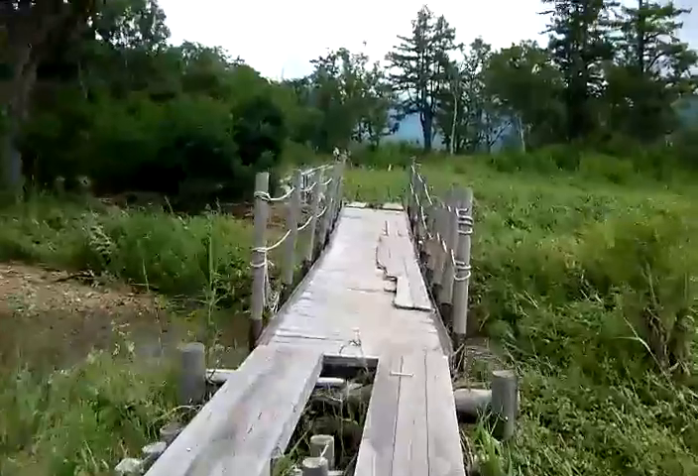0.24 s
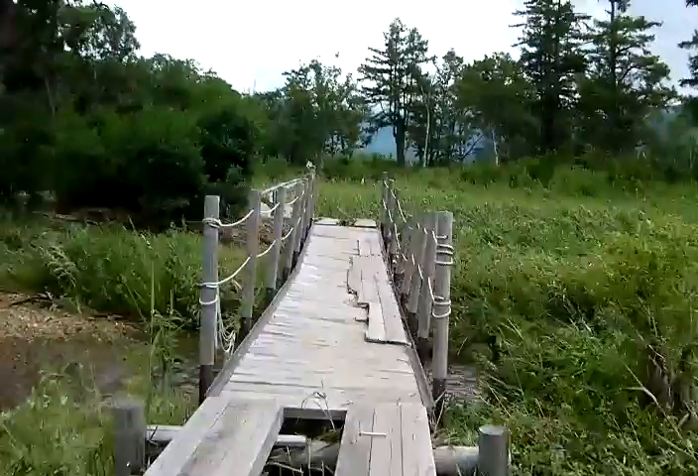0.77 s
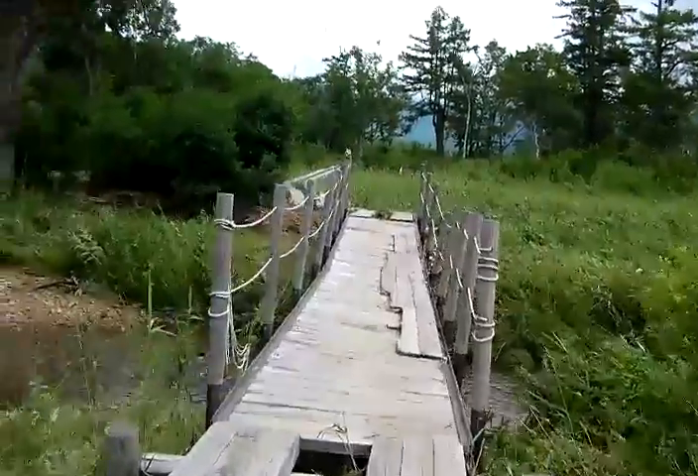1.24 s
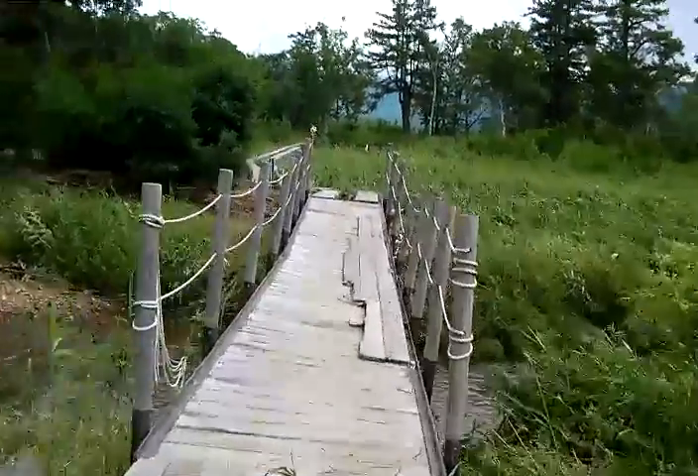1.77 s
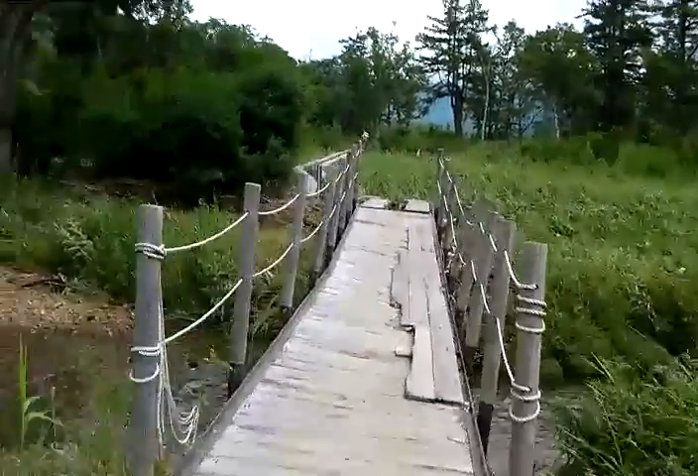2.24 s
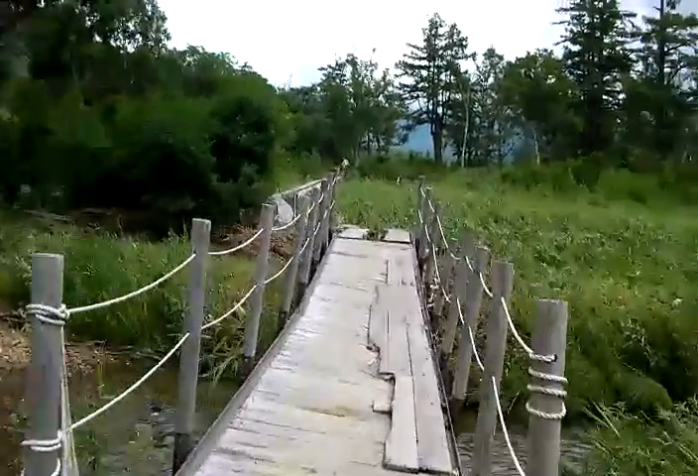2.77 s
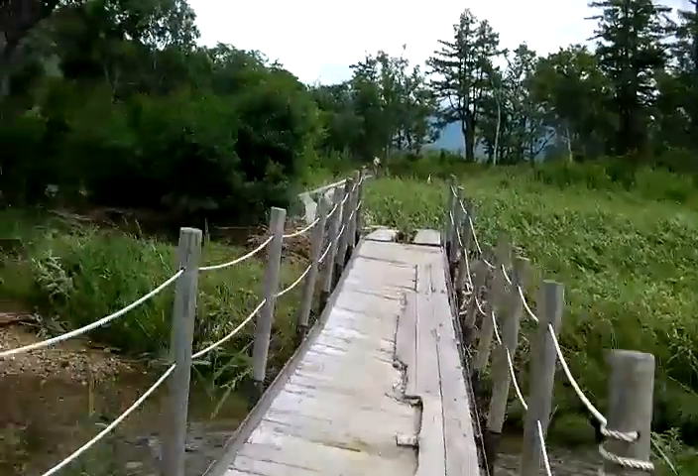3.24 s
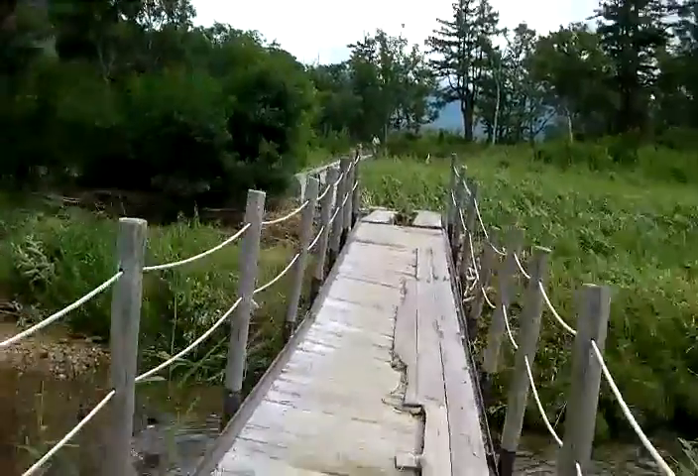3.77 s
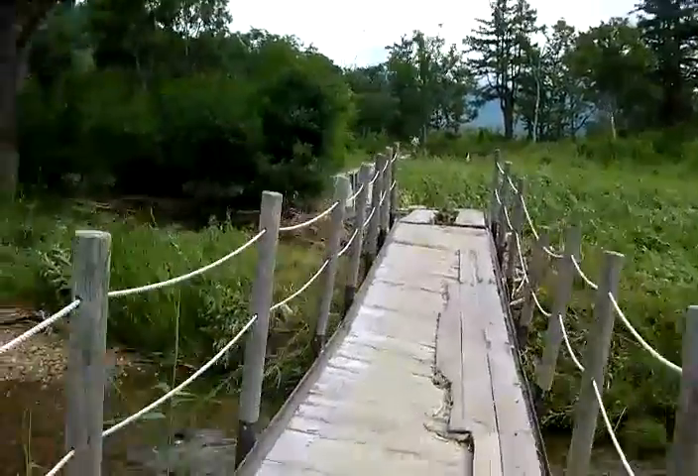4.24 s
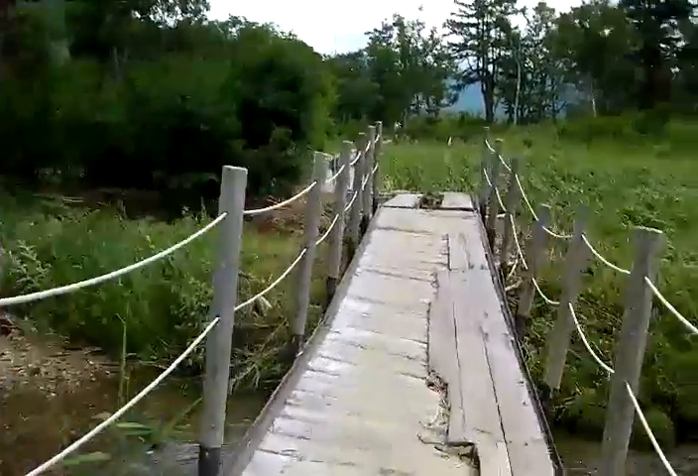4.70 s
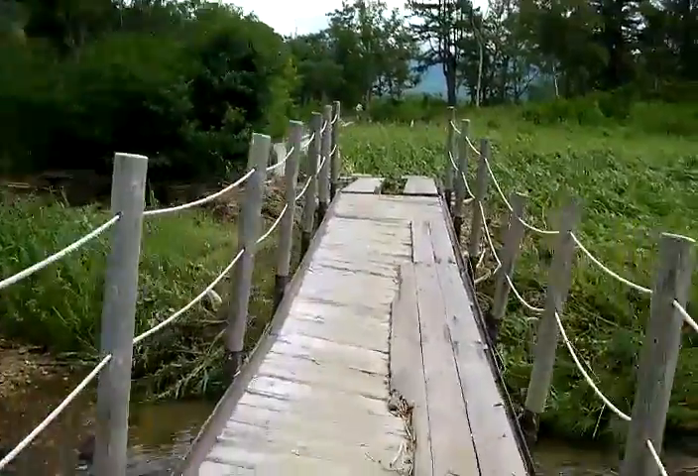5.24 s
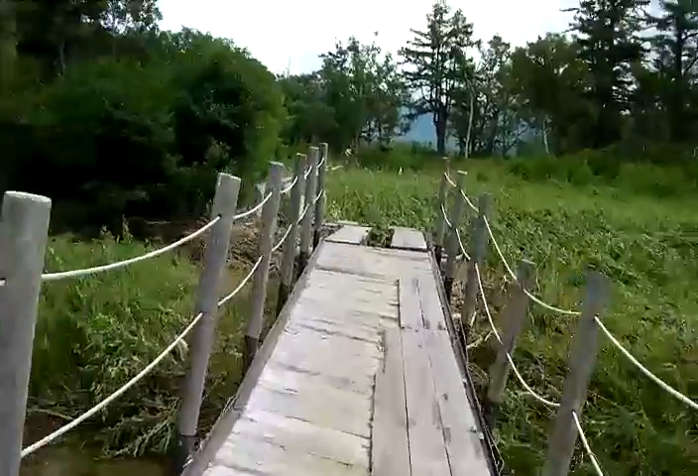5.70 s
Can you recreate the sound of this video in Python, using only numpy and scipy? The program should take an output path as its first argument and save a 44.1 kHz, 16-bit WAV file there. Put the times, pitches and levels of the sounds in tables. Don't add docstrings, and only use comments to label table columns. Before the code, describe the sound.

Steady hiss of a marsh stream grows closer and splashier while soles knock on wooden planks and one loose board clatters.

```python
import sys
import numpy as np
from scipy import signal
from scipy.fft import rfft, irfft, next_fast_len
from scipy.io import wavfile
from scipy.ndimage import uniform_filter1d, map_coordinates

SR = 44100
rng = np.random.default_rng(int(sys.argv[2]) if len(sys.argv) > 2 else 0)


def transcribe(signal):
    frames = np.atleast_2d(signal).T
    limited = np.clip(frames, -1, 1)
    pcm = np.round(limited * 32767).astype(np.int16)
    wavfile.write(sys.argv[1], SR, pcm)


def volts_from_db(level):
    exponent = np.asarray(level, float) / 20
    return 10 ** exponent


N = 263718

# frequency in Hz, level in dB.
PORT_HISS = [(30, -47), (100, -48), (220, -51), (600, -52), (1200, -62), (3000, -58), (8000, -62)]

# start in seconds, length in seconds, level in dB, from pitch in Hz, to pitch in Hz.
TRILLS = [
    (2.25, .17, -47, 7000, 7270),
]
WHISTLES = [
    (3.26, .11, -42, 7100, 6400),
    (3.41, 0.041, -53, 6500, 6500),
]

# frequency in Hz, density in dB per Hz.
HUM = [(25, 0), (48, -4.5), (70, 4), (100, 1.5), (160, -7.5), (260, -15), (340, -47), (600, -120)]
GURGLE = [(100, -90), (200, -45), (290, -9.5), (370, -4.5), (600, -3), (1000, -0.5), (1600, -4),
          (3000, -7.5), (5000, -90)]
RUSH = [(200, -80), (500, -45), (900, -12), (1500, -2), (2300, -2), (2700, -5), (3200, -1.5), (5000, -4.5),
        (9000, -18.5), (12000, -56)]
SPRAY = [(600, -80), (1800, -68), (3000, -6.5), (4500, -2), (6000, 1), (7400, 2), (8300, -6), (9300, -8),
         (10100, -19), (11400, -10.5), (12300, -17), (13100, -43), (15000, -59)]

# start in seconds, level in dB.
SWAYS = [(0.01, -58), (.32, -54), (.42, -49), (.93, -50), (1.14, -59), (1.33, -53), (1.46, -44.5),
         (1.6, -52), (1.79, -37), (1.94, -47), (2.2, -43), (2.47, -55), (2.65, -49), (2.87, -54),
         (2.99, -49), (3.17, -55), (3.57, -42), (3.81, -51), (4.07, -47), (4.17, -49), (4.37, -55),
         (4.47, -58), (4.63, -31), (4.76, -53), (4.96, -58), (5.139, -43), (5.22, -28), (5.53, -54),
         (5.72, -42), (5.79, -40)]
SWAY_RISE_S, SWAY_T60_S = 0.03, 0.4

# time in seconds, level in dB.
NEAR = [(0.0, -42.5), (0.23, -46), (0.95, -43.5), (1.63, -42), (1.9, -42), (2.55, -40.5), (3.51, -40),
        (4.73, -36.5), (5.25, -38.5), (5.7, -36.5), (5.98, -38)]
GURGLE_DB, RUSH_DB, SPRAY_DB = -3.5, -5, -2.5
GURGLE_GROWS, RUSH_GROWS, SPRAY_GROWS = 0.38, 0.67, 1.25
BRIDGE_S, BRIDGE_SPAN_S, BRIDGE_DB = 1.39, 0.07, 6
RIFFLE_S, RIFFLE_SPAN_S, RIFFLE_DB = 4.2, 0.96, 3.5

# start in seconds, peak level in dB.
SPITS = [(0.1885, -40), (0.4803, -41), (1.2675, -55), (1.2855, -42), (1.4965, -33), (2.1231, -43),
         (2.156, -47), (2.2169, -45), (2.4877, -46), (2.616, -42), (2.9796, -47), (3.5059, -52),
         (3.5972, -42), (3.6252, -33), (3.8417, -41), (3.8581, -35), (3.902, -39), (3.9735, -28),
         (4.0602, -46), (4.0856, -35), (4.1864, -45), (4.3161, -41), (4.3365, -45), (4.3964, -36),
         (4.6404, -40), (4.6588, -38), (4.9726, -30), (5.0818, -38), (5.0993, -32), (5.18, -26),
         (5.2121, -32), (5.3692, -41), (5.4615, -47), (5.5238, -42), (5.5433, -37), (5.5613, -35),
         (5.676, -34), (5.7643, -36), (5.9289, -36), (5.9529, -35)]

# start in seconds, peak level in dB, pitch in Hz.
SPLASHES = [(0.191, -21.5, 5070), (0.2778, -25, 5600), (0.378, -23, 5670), (1.393, -27, 3100),
            (1.958, -25, 4540), (1.9884, -24, 4360), (1.9967, -18.5, 4970), (2.598, -23, 4800),
            (4.588, -20, 4900), (2.72, -22, 7100), (2.805, -24, 7100), (2.99, -24, 7300),
            (2.6512, -20, 4900), (3.175, -25.5, 2500), (3.192, -25, 4460), (3.626, -15.5, 6840),
            (3.687, -17, 7100), (3.792, -18, 5300), (3.8382, -14, 6300), (3.9724, -19, 4240),
            (4.0857, -21, 2990), (4.3166, -15, 7200), (4.417, -11, 6740), (4.594, -18, 6000),
            (4.673, -14, 7200), (4.727, -17, 7160), (4.6573, -12.5, 6550), (4.689, -16, 4430),
            (4.7466, -35, 7470), (5.13, -14, 6200), (5.135, -14, 7300), (5.117, -21, 6200),
            (5.3008, -16, 6010), (5.5695, -11, 5900), (5.545, -16, 6000), (.29, -26, 5040),
            (.3591, -28, 5930), (.1306, -22, 4440), (1.6791, -33, 2970), (2.1036, -26, 6150),
            (3.5977, -27, 3040), (4.1644, -22, 2930), (4.2243, -22, 5960), (4.362, -19, 6790),
            (4.99, -16, 6200), (5.19, -14, 6500), (5.205, -15, 6800), (5.6138, -14, 5230),
            (5.7928, -10, 7180)]
SMALL_DB, SMALL_HZ, SMALL_SPREAD = -29, 5800, 0.25

# start in seconds, peak level in dB, pitch in Hz, length in cycles.
BUBBLES = [(0.126, -37, 427, 6), (1.132, -19, 2170, 3), (1.2, -26.5, 1880, 9.7), (1.279, -27, 2050, 9.2),
           (1.619, -32, 795, 13), (2.046, -26, 1150, 5), (2.103, -30, 402, 3.9), (2.128, -28.5, 665, 7.1),
           (3.194, -30.5, 443, 5), (3.231, -27, 455, 4.1), (3.255, -31.5, 462, 7.1), (3.342, -26, 670, 3),
           (4.269, -27, 1770, 13), (4.56, -29, 964, 5.6), (4.885, -23.5, 990, 5.4),
           (5.091, -24.5, 1120, 9.5), (5.158, -32, 530, 7.5), (5.259, -15, 1510, 2.9), (5.443, -33, 590, 9),
           (5.569, -24, 765, 5.2), (5.797, -22, 1640, 3.4), (5.946, -20.5, 1070, 4.1)]

# start in seconds, peak
# level in dB, pitch in Hz, 60 dB decay in seconds, pitch rise as a ratio.
GLUGS = [(1.479, -25, 2600, .012, .05), (1.497, -26, 1500, .016, .09), (1.792, -32, 1300, .015, .1),
         (2.018, -33, 390, .09, .02), (2.197, -33, 420, .08, .02), (2.5305, -26, 1080, .016, .05),
         (2.533, -28, 450, .08, .02), (3.104, -28, 1250, .012, .4), (3.109, -31, 1700, .01, .1),
         (4.317, -43, 67, .15, .02), (4.692, -27, 190, .08, .01), (5.175, -34, 72, .16, .02),
         (5.265, -29, 1700, .03, .12), (5.463, -19, 870, .026, 1.15), (5.722, -30, 260, .05, .02),
         (1.462, -23, 115, .1, .02),
    (1.857, -25, 470, .07, .2),
]

# centre in seconds, level in dB, length in seconds.
SCUFFS = [
    (1.135, -46.5, 0.078),
    (1.2, -47, 0.026),
    (1.487, -35, 0.031),
    (2.045, -39, 0.012),
    (2.207, -43.5, 0.064),
    (3.115, -40, 0.014),
    (3.333, -38, 0.064),
    (4.157, -46, 0.025),
    (5.468, -38.5, 0.025),
    (5.787, -39, 0.014),
]

# start in seconds, level in dB.
SNAPS = [
    (1.136, -32),
    (1.497, -30),
    (1.789, -31),
    (3.902, -33),
    (4.5937, -14),
    (4.6893, -21),
    (5.571, -28),
]

# start in seconds, peak level in dB, pitch in Hz, length in cycles.
TAPS = [(.859, -41, 350, 2), (.9335, -29, 2000, 5), (.936, -33, 424, 2.6), (1.79, -28, 646, 2.6),
        (1.8485, -26, 900, 3.4), (1.941, -25, 480, 1.5), (2.5292, -14, 1100, 2.1), (3.579, -33, 130, 1.8),
        (2.989, -27.5, 450, 2), (3.068, -29, 600, 1.8), (4.0766, -25.5, 446, 1.7), (4.631, -25, 500, 1.6),
        (4.69, -16, 2300, 2), (4.6896, -17.5, 1520, 3.2), (4.6897, -18, 604, 1.8), (5.224, -30, 1300, 2.6),
        (5.4641, -20.5, 1200, 3), (5.718, -23, 330, 2.1), (5.7968, -22, 2300, 4), (5.799, -32, 1420, 4),
        (5.863, -28, 3100, 6.7), (5.707, -38, 1090, 6), (1.83, -36, 1280, 6), (3.915, -30, 1620, 6),
        (4.026, -29, 2220, 6.5), (.598, -33, 2100, 7.3), (.647, -34, 3100, 9), (.612, -30, 3900, 7.4)]

# start in seconds, blow level in dB, contact in milliseconds.
BOUNCES = [
    (1.4529, -5.5, 1.47),
    (1.46, -4, 0.61),
    (1.4659, -18, 1.24),
    (1.4737, -1.5, 2.7),
    (1.4796, -17, 2.9),
    (1.4911, -20, 1.9),
    (1.499, -25, 1.6),
    (1.521, -28, 2.3),
    (1.539, -32.5, 1.6),
]
# frequency in Hz, level in dB, 60 dB decay in seconds.
LOOSE = [(114, 0.5, 0.051), (208, 2.5, 0.063), (269, 0, 0.1), (330, 1.5, 0.091), (388, -1, 0.18),
         (508, 9, 0.032), (641, 1, 0.064), (780, -3, 0.042), (880, -8, .022), (1270, -13, 0.031),
         (1670, -22, .02), (2500, -5, .015)]

# start in seconds, board knock in dB, beam thump in dB, beam pitch in Hz, sole slap in dB.
HEELS = [(0.317, -39, -44, 100, -46), (0.856, -45, -49, 107, -48), (0.933, -43, -43, 75.4, -36),
         (1.787, -29, -22, 116, -24), (2.006, -30.5, -46, 115, -29), (2.192, -43, -63, 80.7, -36),
         (2.989, -31, -47, 110, -39), (3.529, -36.5, -86, 67.3, -45), (3.578, -39, -38.5, 81, -34.5),
         (4.074, -33.5, -58, 94.2, -24.5), (4.154, -32, -41, 88, -39), (4.182, -43, -50, 82, -27),
         (4.631, -37, -27.5, 105, -36), (4.642, -47, -35, 100, -47), (4.734, -48, -41, 75, -55),
         (4.766, -57, -45, 80.4, -55), (5.262, -50, -39, 85, -50), (5.749, -50, -42, 100, -50),
         (3.8, -57, -42, 72, -55), (5.223, -33.5, -37, 86.1, -29), (5.303, -34, -50, 88.8, -25),
         (5.718, -27, -28, 98, -43), (5.784, -44, -33, 96.4, -44), (5.773, -55, -42, 90, -55)]
# start in seconds, board knock in dB, board pitch in Hz, joist thump in dB, sole slap in dB.
TOES = [(0.385, -38.5, 420, -55, -34), (0.424, -48, 597, -52, -62), (1.849, -24, 394, -36, -29),
        (1.938, -41, 605, -49, -46), (2.463, -28, 390, -51, -47), (2.528, -24, 384, -53, -19),
        (2.581, -41, 590, -54, -30.5), (3.065, -29.5, 488, -65, -27), (3.613, -36, 384, -43.5, -37),
        (4.6881, -37, 500, -33.5, -14), (5.142, -32.5, 564, -51, -46)]
PLANK_HZ, JOIST_HZ = 390, 169.4
# frequency in Hz, level in dB.
SLAP = [(120, -33), (300, -6.5), (600, -3.5), (1000, -9.5), (1600, -4.5), (2400, -11.5), (5000, -17),
        (9000, -38)]

# frequency in Hz, left-right correlation from 0 to 1.
ALIKE = [(5000, 0.85), (6200, 0.75), (7600, 1), (8300, 0.76), (9200, 0.27), (11000, 0.51), (13000, 0.1)]
# frequency in Hz, left over right in dB.
LEAN = [(5000, .4), (5800, 1.5), (7500, 3), (8800, 7.5), (9600, -1), (10600, 7), (11700, 2), (13000, 15)]
# frequency in Hz, phase lead in radians.
LEAD = [(7240, 0.24), (7840, 1.53), (8870, 0.34), (9300, 6.1), (9730, 6.8), (13200, 8.1)]
MONO_HZ, TOP_HZ = 4300, 13400


def unit(x):
    return x / np.sqrt(np.mean(x ** 2) + 1e-20)


def along(points, hz):
    f, v = np.transpose(points)
    return np.interp(np.log(hz + 1), np.log(f + 1), v)


def curves(rows):
    s, *cols = np.transpose(rows)
    return [np.interp(np.arange(N) / SR, s, c) for c in cols]


def wobble(rate):
    knots = rng.standard_normal(int(N * rate / SR) + 4)
    return map_coordinates(knots, [np.arange(N) * rate / SR])


def onset(s, span):
    return 0.5 + 0.5 * np.tanh((np.arange(N) / SR - s) / span)


def filtered(x, response):
    m = 2 * next_fast_len(N // 2 + 4096)
    return irfft(rfft(x, m) * response(np.fft.rfftfreq(m, 1 / SR)), m)[..., :N]


def causal(points, hz):
    cepstrum = irfft(np.log(volts_from_db(along(points, hz))))
    cepstrum[1:len(hz)] *= 2
    cepstrum[len(hz):] = 0
    return np.exp(rfft(cepstrum))[:len(hz)]


def rings(s, db, hz, t60, attack, rise, size):
    columns = np.broadcast_arrays(s, db, hz, t60)
    s, db, hz, t60 = (np.asarray(v, float)[:, None] for v in columns)
    t = np.arange(size) / SR
    wave = np.sin(2 * np.pi * hz * t * (1 + rise * t / t60))
    wave = wave * volts_from_db(db - 60 * t / t60) * (1 - np.exp(-t / attack))
    at = (s * SR).astype(int) + np.arange(size)
    return np.bincount(at.ravel(), wave.ravel(), N + size)[:N]


def call(rows, slur, attack, t60, rough_db, rough_hz, rate):
    t, out = np.arange(N) / SR, 0
    for s, length, db, from_hz, to_hz in rows:
        glide = np.exp(-np.maximum(t - s, 0) / (slur * length))
        hz = to_hz + (from_hz - to_hz) * glide + rough_hz * wobble(2 * rate)
        fade_db = -60 * np.maximum(t - s - length, 0) / t60
        shape = np.clip((t - s) / attack, 0, 1) * volts_from_db(db + fade_db + rough_db * wobble(rate))
        out = out + shape * np.sin(2 * np.pi * np.cumsum(hz) / SR)
    return out


def bird():
    whistle = call(WHISTLES, slur=0.25, attack=0.01, t60=0.08, rough_db=0.0, rough_hz=30.2, rate=59)
    trill = call(TRILLS, slur=0.45, attack=0.0092, t60=0.3, rough_db=2.5, rough_hz=110, rate=99)
    return whistle * volts_from_db([[-1.5], [1.5]]) + trill * volts_from_db([[-4], [3]])


def grains(count, hz, spread, cycles, scatter_db):
    when, size = rng.random((2, count))
    pitch = np.clip(hz * np.exp(spread * rng.standard_normal(count)), hz / 2, 13000)
    db = -scatter_db * np.log(size + 1 / 30)
    length = int(SR * cycles / hz) + 8
    return unit(rings(when * N / SR, db, pitch, cycles / pitch, 0.0002, 0.28, size=length))


def droplet_pair(hz, spread, cycles, scatter_db):
    count = int(N / SR * 450)
    return np.array([grains(count, hz, spread, cycles, scatter_db) for _ in range(2)])


def water(spectrum, droplets, share, patchy_db):
    z = signal.stft(rng.standard_normal((2, N + 512)), nperseg=256)[2]
    field = uniform_filter1d(rng.standard_normal(z.shape[1:]), size=8, axis=0)
    field = uniform_filter1d(field, size=6, axis=1)
    noise = unit(signal.istft(z * volts_from_db(patchy_db * unit(field)), nperseg=256)[1][:, :N])
    share = np.clip(share, 0, 1)
    mixed = np.sqrt(1 - share) * noise + np.sqrt(share) * droplets
    return unit(filtered(mixed, lambda hz: volts_from_db(along(spectrum, hz))))


def sway():
    t, out = np.arange(N) / SR, 0
    for s, db in SWAYS:
        rise = np.exp(-(np.minimum(t - s, 0) / SWAY_RISE_S) ** 2)
        out = out + rise * volts_from_db(min(db, -44) - 60 * np.maximum(t - s, 0) / SWAY_T60_S)
    return out


def deck_hum():
    level = volts_from_db(-54.5) + sway() * volts_from_db(-2.0 + 0.73 * wobble(24))
    return level * water(HUM, 0, share=0, patchy_db=-0.5)


def flow_levels():
    near_db, = curves(NEAR)
    mean_db, swing_db = near_db.mean(), near_db - near_db.mean()
    gurgle_db = mean_db + GURGLE_DB + GURGLE_GROWS * swing_db
    gurgle_db = gurgle_db - BRIDGE_DB * (1 - onset(BRIDGE_S, BRIDGE_SPAN_S))
    rush_db = mean_db + RUSH_DB + RUSH_GROWS * swing_db
    spray_db = mean_db + SPRAY_DB + SPRAY_GROWS * swing_db + RIFFLE_DB * onset(RIFFLE_S, RIFFLE_SPAN_S)
    return gurgle_db, rush_db, spray_db


def stream():
    gurgle_db, rush_db, spray_db = flow_levels()
    surge = 0.53 * wobble(13) + 0.48 * wobble(30)
    spatter = droplet_pair(4530, 0.67, 4.3, 5.8)
    low_drops = droplet_pair(685.0, 0.523, 19.0, 2.2)
    mid_drops = droplet_pair(2206, 0.484, 31, 3.6) + 0.5 * spatter
    high_drops = droplet_pair(7630, 0.423, 26.5, 1.8) + 0.76 * spatter
    gurgle = water(GURGLE, low_drops, share=0.072, patchy_db=1.0)
    rush = water(RUSH, mid_drops, share=0.076, patchy_db=2.5)
    spray = water(SPRAY, high_drops, share=0.12, patchy_db=2.0)
    gurgle *= volts_from_db(gurgle_db - 1.5 + surge + 1.2 * wobble(16))
    rush *= volts_from_db(rush_db + 0.5 + surge + 0.9 * wobble(20))
    spray *= volts_from_db(spray_db - 1.5 + surge + 0.59 * wobble(45))
    return gurgle + rush + spray


def spits():
    s, db = np.transpose(SPITS)
    t = np.arange(200) / SR
    at = (s[:, None] * SR).astype(int) + np.arange(len(t))
    puffs = volts_from_db(db[:, None] + 10.5 - 60 * t / 0.006) * rng.standard_normal((2, len(s), len(t)))
    pair = np.array([np.bincount(at.ravel(), p.ravel(), N)[:N] for p in puffs])
    colour = [(5500, -40), (7500, -2)] + [(f, db + 4.5) for f, db in SPRAY[6:]]
    return filtered(pair, lambda hz: volts_from_db(along(colour, hz)))


def splashes():
    when, size, pitch = rng.random((32, 3)).T
    small_s = np.sqrt(when) * N / SR
    small_hz = SMALL_HZ * np.exp(2 * SMALL_SPREAD * (pitch - 0.5))
    small = [small_s, SMALL_DB + 10 * (size - 0.5), small_hz]
    s, db, hz = np.hstack([np.transpose(SPLASHES), small])
    clicks = rings(s + 0.00073, db + 5.5, hz, 14 / hz, 0.0003, 0.025, size=400)
    clicks += rings(s + 0.0011, db - 15, 1.86 * hz, 6 / hz, 0.0001, 0.05, size=400)
    clicks += rings(s + 0.0008, db - 1.5, 0.77 * hz, 6 / hz, 0.00018, 0.05, size=400)
    return clicks


def bubbles():
    s, db, hz, cycles = np.transpose(BUBBLES)
    return rings(s + 0.00105, db, hz, 3 * np.clip(cycles, 1, 20) / hz, 0.0013, 0.037, size=2000)


def glugs_and_creaks():
    s, db, hz, t60, rise = np.transpose(GLUGS)
    return rings(s, db + 0.5, hz, t60, 0.00061, rise[:, None], size=7000)


def scuffs():
    t = np.arange(N) / SR
    stroke = sum(volts_from_db(db) * np.exp(-(2.75 * (t - s) / length) ** 2) for s, db, length in SCUFFS)
    grit = volts_from_db(3.1 * wobble(400)) * rng.standard_normal(N)
    return stroke * unit(filtered(grit, lambda hz: volts_from_db(along(SLAP, hz))))


def snaps():
    s, db = np.transpose(SNAPS)
    swing = rings(s, db + 7.0, 5600, 0.0015, 0.00005, -0.1, size=120)
    rebound = rings(s + 0.00054, db, 3700, 0.0023, 0.0001, 0, size=120)
    return swing + rebound


def taps():
    s, db, hz, cycles = np.transpose(TAPS)
    return -rings(s, db + 4.5, hz, 2.7 * np.clip(cycles, 1, 20) / hz, 0.00036, -0.045, size=2500)


def loose_board():
    hz, db, t60 = np.transpose(LOOSE)
    body = rings(0, db[1::2], hz[1::2], t60[1::2], 0.0004, 0, size=9000)
    body -= rings(0, db[::2], hz[::2], t60[::2], 0.00019, 0, size=9000)
    blows = np.zeros(N)
    for s, db, ms in BOUNCES:
        push = np.hanning(max(round(ms * SR / 1000), 5))
        blows[round(s * SR):][:len(push)] += volts_from_db(db - 13.0) * push / push.sum()
    return signal.fftconvolve(blows, body[:9000])[:N]


def contacts():
    heels = [(s, knock, PLANK_HZ, thump, hz, slap) for s, knock, thump, hz, slap in HEELS]
    toes = [(s, knock, hz, thump, JOIST_HZ, slap) for s, knock, hz, thump, slap in TOES]
    return np.transpose(heels + toes)


def sole_slap(s, slap_db):
    t = np.arange(600) / SR
    burst = volts_from_db(slap_db[:, None] + 14.0 - 60 * t / 0.0094) * rng.standard_normal((len(s), len(t)))
    burst[:, 0] = volts_from_db(slap_db + 16)
    at = (s[:, None] * SR).astype(int) + np.arange(len(t))
    return filtered(np.bincount(at.ravel(), burst.ravel(), N), lambda hz: causal(SLAP, hz))


def steps():
    s, knock_db, board_hz, thump_db, beam_hz, slap_db = contacts()
    s = s + 0.00142
    modes = [(0.99, 2.5, 0.042), (1.494, -5.5, 0.026), (2.37, -10.0, 0.011), (0.626, -5.5, 0.032)]
    board = sum(rings(s, knock_db + db, ratio * board_hz, t60, 0.00059, -0.051, size=5000)
                for ratio, db, t60 in modes)
    beam = rings(s + 0.00083, thump_db + 14, beam_hz, 0.053, 0.0037, -0.027, size=6000)
    beam += rings(s + 0.00062, thump_db + 0.5, 1.79 * beam_hz, 0.048, 0.0024, -0.05, size=6000)
    return beam - board + sole_slap(s, slap_db)


def at_ports(sound):
    def turn(hz):
        return np.arccos(np.clip(along([(MONO_HZ, 1)] + ALIKE, hz), 0, 1 - 1 / 5000)) / 2

    def ports(hz):
        lean_db = along([(MONO_HZ, 0)] + LEAN, hz) * [[0.5], [-0.5]]
        return volts_from_db(lean_db) * np.exp(along([(MONO_HZ, 0)] + LEAD, hz) * [[0.5j], [-0.5j]])

    mid, side = filtered(sound, lambda hz: np.array([np.cos(turn(hz)), np.sin(turn(hz))]))
    return filtered(np.array([mid + side, mid - side]), ports)


def scene():
    near = stream() + deck_hum() + spits()
    hits = splashes() + bubbles() + glugs_and_creaks()
    hits += scuffs() + snaps() + taps() + loose_board() + steps()
    near += np.array([hits, volts_from_db(-13.0) * np.roll(hits, SR // 500)])
    return at_ports(near) + bird()


def top_cut(x):
    return signal.sosfilt(signal.butter(12, 13590, fs=SR, output="sos"), x)


def record(dry):
    hiss = filtered(rng.standard_normal((2, N)), lambda hz: volts_from_db(along(PORT_HISS, hz)))

    def microphone(hz):
        notch = volts_from_db(-6.5 * np.exp(-((hz - 7880) / 110) ** 2))
        bass_cut = hz ** 2 / (30 ** 2 + hz ** 2)
        return notch * (hz < TOP_HZ) * bass_cut

    return top_cut(filtered(dry + hiss, microphone))


dry = scene()
out = record(dry)
transcribe(out)
```